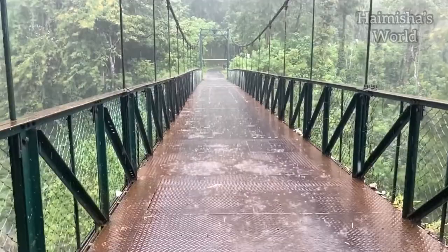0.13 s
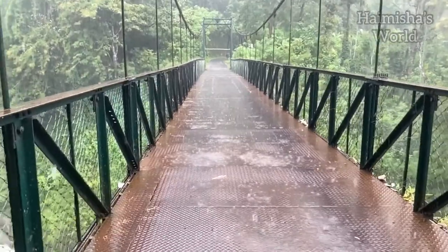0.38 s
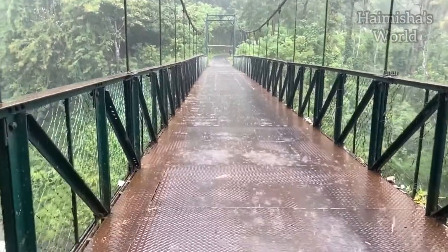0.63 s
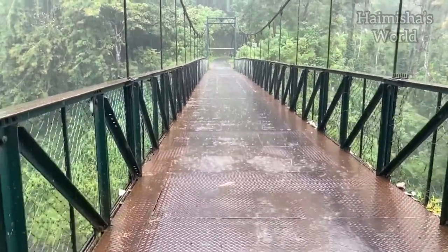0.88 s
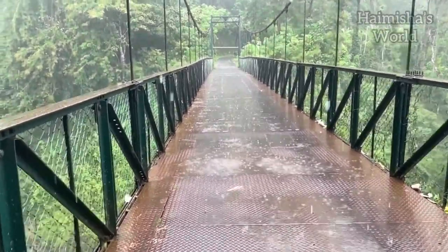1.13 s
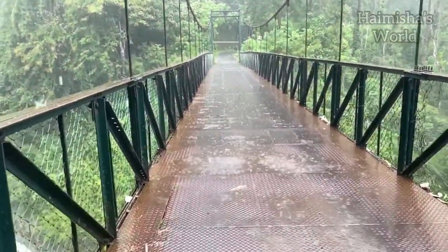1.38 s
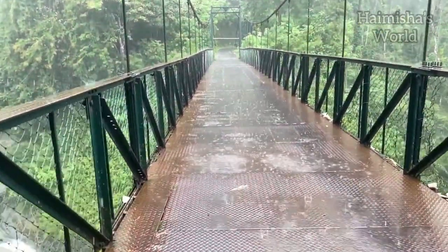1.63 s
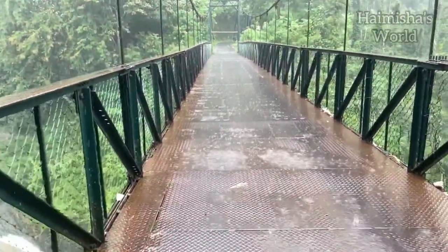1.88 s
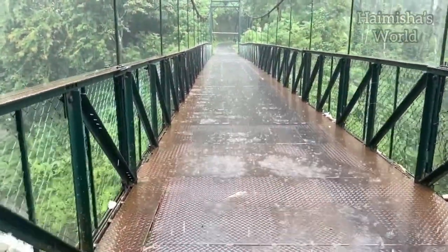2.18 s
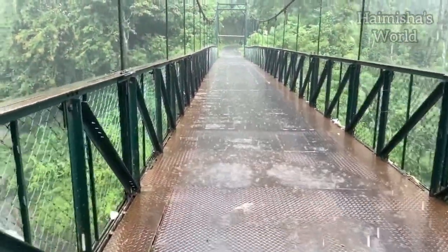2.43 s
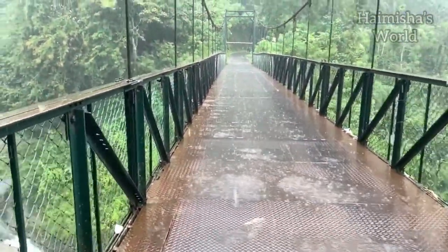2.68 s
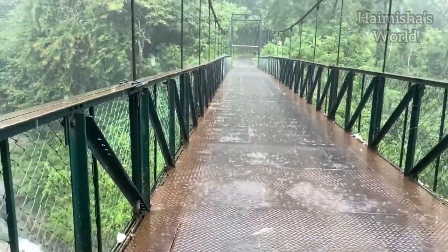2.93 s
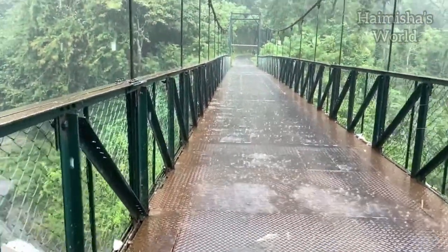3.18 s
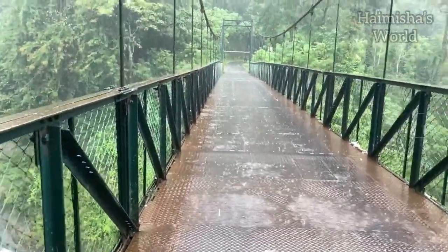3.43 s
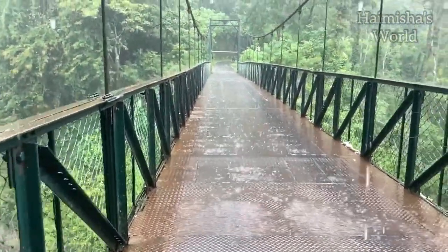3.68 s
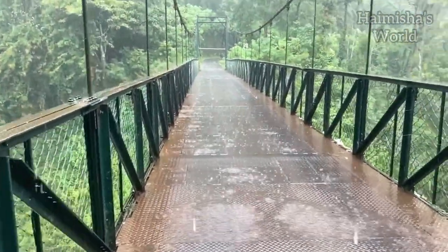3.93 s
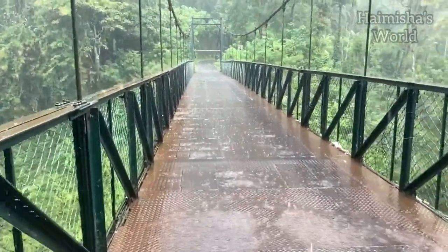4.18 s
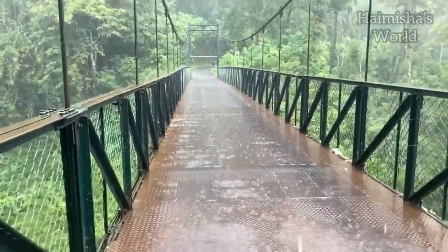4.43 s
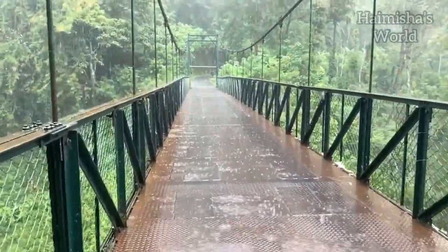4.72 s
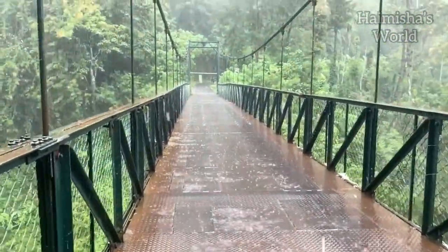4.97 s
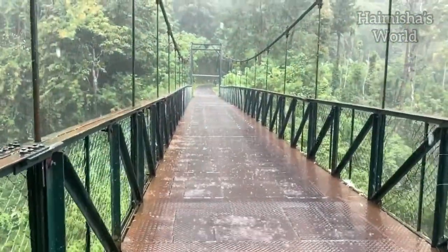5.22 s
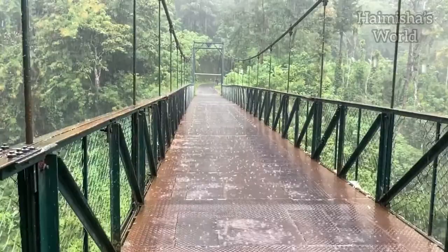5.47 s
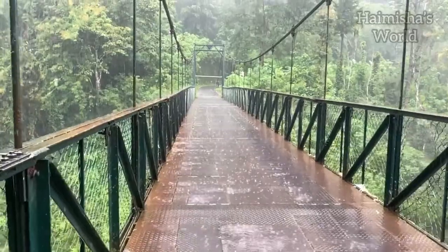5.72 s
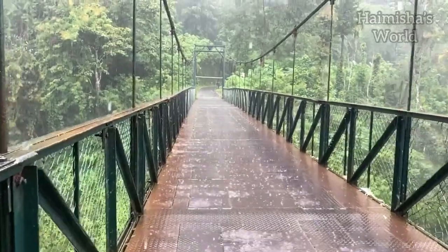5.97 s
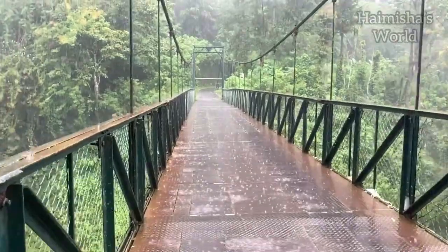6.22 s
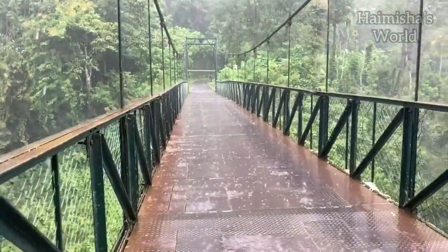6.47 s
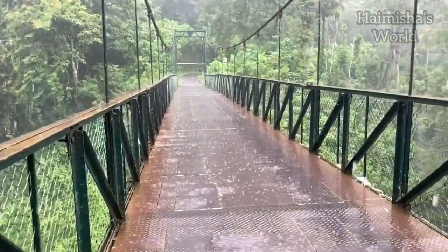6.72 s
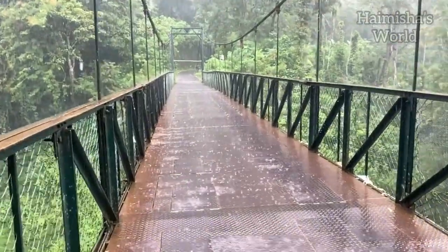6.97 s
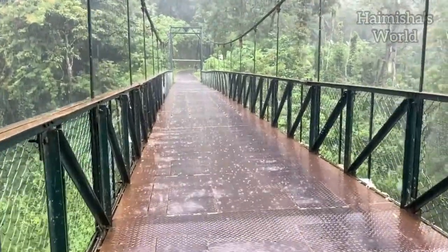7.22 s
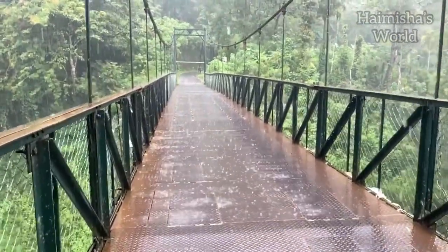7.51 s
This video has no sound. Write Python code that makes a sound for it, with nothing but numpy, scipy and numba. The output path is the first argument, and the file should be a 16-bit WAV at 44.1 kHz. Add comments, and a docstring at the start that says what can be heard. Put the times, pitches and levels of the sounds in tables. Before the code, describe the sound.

Continuous steady rain on a steel footbridge and surrounding forest, a dense soft patter over a low rumble. Close overhead, big drops hit umbrella cloth with short slaps and low hollow booms, irregular and sometimes clustered, amid many lighter taps. Crisp splashes flick on the deck and faint metallic pings ring. Close stereo pair beneath the umbrella, outdoors, top end slightly dulled.

```python
"""Rain on a steel footbridge

Steady rain on the bridge and the forest around it, heard from under an umbrella. Far drops are noise bands
flaring together into a patter over a low rumble; near splashes on the deck flare its upper bands further.
Drops on the stretched cloth are damped sines that slap and then boom; the steelwork pings and rings the same
way, and a faint wavering sine passes once. A pair of microphones a hand apart hears it, each with its own
phase and balance by frequency, the treble reaching the right one first."""
import sys
import numpy as np
from scipy import signal
from scipy.fft import rfft, irfft, next_fast_len
from scipy.io import wavfile
from scipy.ndimage import uniform_filter1d
from numba import njit

SR = 44100
rng = np.random.default_rng(int(sys.argv[2]) if len(sys.argv) > 2 else 0)


def linear_from_db(decibels):
    """Turn decibels (scalar or array-like) into linear amplitude factors; 0 gives 1."""
    return 10 ** (np.asarray(decibels, float) / 20)


def store_pcm(level_fs):
    """Save levels as 16-bit WAV."""
    pcm = np.round(np.clip(level_fs, -1, 1) * 32767).astype(np.int16)
    wavfile.write(sys.argv[1], SR, np.atleast_2d(pcm).T)


N = 335950

# strength of the far rain, before the microphones' balance: (time [s], level [dB])
RAIN_STRENGTH = [(0.0, -33), (1.4, -32), (2.76, -32.5), (4.0, -31), (5.11, -32.5), (5.6, -32), (7.62, -32)]
# relative colour of the far rain: (frequency [Hz], level per Hz [dB])
PATTER_COLOUR = [(20, -0.5), (35, 6), (70, -0.5), (120, -2), (200, 0.5), (260, -4.5), (320, -4), (400, -9),
                 (480, -12), (600, -5.5), (900, -14), (1200, -13.5), (1950, -17.5), (2600, -15.5),
                 (4200, -25.5), (6000, -27.5), (7500, -34.5), (9300, -35.5)]
# tonal balance of the microphones: (frequency [Hz], left minus right [dB])
MICROPHONE_BALANCE = [(60, -1.5), (180, -3), (320, 2.5), (560, .5), (970, -2.5), (1700, -.5), (3000, -.5),
                      (4800, -1.5), (6100, 0), (9500, 0)]
# how alike the microphones hear the far rain: (frequency [Hz], shared power [0-1])
ALIKENESS = [(30, .92), (150, .75), (300, .45), (550, .12), (850, .65), (1250, .25), (1600, .35),
             (1900, .1), (2500, .15), (3300, .48), (3800, .12), (4500, .62), (5400, .94), (6200, 1),
             (9500, 1)]
# phase lead of the left microphone: (frequency [Hz], lead [half turns])
LEFT_LEAD = [(0, 0), (950, 1.43), (2840, 5.16), (3100, 6.0), (3360, 6.2), (4000, 5.35), (5450, 4),
             (9550, 0)]
# upper modes of the umbrella cloth, before detuning and weighting: (frequency [Hz], level [dB], t60 [s])
CLOTH_MODES = [(300, 0, .045), (370, 0, .04), (450, -1, .035), (540, 0, .03), (640, 0, .028),
               (760, -1, .025), (900, -1, .025), (1080, -3, .022), (1300, -5, .02), (1600, -6, .02),
               (2000, -7, .018), (2500, -8, .015), (3100, -12, .015)]
# big drops on the cloth, levels before swell and pan:
# (time [s], boom level [dB], boom frequency [Hz], slap level [dB], slap centre [Hz])
BIG_DROPS = [(0.163, -24.5, 220, -25, 360), (0.511, -23, 247, -21.5, 360), (0.53, -23, 199, -26, 600),
             (0.733, -23, 198, -39, 810), (0.953, -30, 250, -17, 640), (0.967, -28, 197, -23, 400),
             (0.985, -25, 207, -26, 860), (1.035, -23, 280, -24, 660), (1.306, -16.5, 174, -20, 670),
             (1.284, -24.5, 245, -28, 700), (1.41, -23, 190, -29, 780), (1.421, -34, 240, -21.5, 700),
             (1.46, -20, 179, -26, 560), (1.484, -23.5, 263, -19.5, 750), (1.502, -17, 152, -18.5, 360),
             (1.528, -28, 270, -23, 360), (1.603, -33, 181, -22, 880), (1.67, -16, 131, -18, 754),
             (1.828, -25, 160, -20, 420), (2.09, -19, 190, -21, 630), (2.42, -31, 180, -25, 460),
             (2.436, -27, 109, -18.5, 820), (2.686, -19.5, 226, -37, 360), (3.105, -20.5, 204, -20.5, 360),
             (3.17, -24, 236, -33, 720), (3.29, -23, 226, -34, 360), (3.492, -21, 171, -27, 430),
             (3.576, -20, 167, -34, 1240), (3.767, -20.5, 202, -27, 410), (4.042, -16.5, 174, -18.5, 650),
             (4.077, -25, 284, -21, 680), (4.111, -21, 250, -35, 800), (4.188, -24, 202, -23, 750),
             (4.295, -35, 224, -23, 410), (4.51, -25, 150, -23, 400), (4.664, -19.5, 207, -22.5, 610),
             (4.688, -30, 220, -26.5, 600), (4.708, -24, 180, -21, 540), (4.719, -29, 190, -25, 1210),
             (5.111, -18.5, 160, -22.5, 570), (5.139, -18.5, 193, -23, 470), (5.322, -22, 177, -37, 930),
             (5.433, -26, 189, -25, 620), (5.579, -18.5, 199, -23, 560), (5.7, -21, 202, -25, 900),
             (5.781, -20, 220, -22.5, 660), (5.792, -28, 217, -18, 590), (6.09, -25, 202, -23.5, 890),
             (6.386, -24, 187, -18.5, 700), (6.429, -15.5, 170, -22, 560), (6.497, -22, 244, -21, 600),
             (6.701, -22, 204, -25.5, 410), (6.85, -18, 152, -24.5, 600), (7.194, -23, 200, -20, 640),
             (7.353, -17, 185, -19.5, 400)]
# near splashes on the deck, over the mean patter in the upper middle and in the treble:
# (time [s], body level [dB], spray level [dB])
NEAR_SPLASHES = [(0.108, -8, 13.5), (0.163, 11, 1.5), (0.512, 7.5, -0.5), (0.6755, 8, 9), (0.948, 7, -11.5),
                 (1.063, -3, 16.5), (1.306, 7, 5), (1.601, 8, -0.5), (2.084, 7, 11), (2.385, -2.5, 8.5),
                 (2.399, 0.5, 11), (2.4204, 6.5, 9), (2.624, -1, 15.5), (2.634, 9.5, 13.5),
                 (2.683, 10.5, -2), (2.93, 9, 9), (3.104, 7.5, -11.5), (3.3837, -12, 11), (3.783, 6.5, 1),
                 (4.72, 12, 3), (5.1366, 9, -3.5), (5.576, 13, -11), (5.7628, 9.5, 12.5), (6.0071, 0.5, 13),
                 (6.0166, -3, 10), (6.2096, 11, 11.5), (6.3823, 13.5, 4.5), (6.4275, 6.5, -10),
                 (6.698, 7, 7)]
# the faint tone before it wavers: (time [s], frequency [Hz], rms level [dB])
TONE_PATH = [(5.36, 915, -62), (5.46, 924, -49), (5.58, 909, -42.5), (5.68, 900, -49), (5.76, 860, -51),
             (5.9, 850, -62)]
# long rings of the steelwork, before detuning: (frequency [Hz], relative level [dB], t60 [s])
STEEL_RINGS = [(590, 0, 0.35), (640, -4.5, 0.22), (842, 1, 0.26), (888, -4.5, 0.42), (1060, -2, .25),
               (1424, -9, 0.16), (1650, -6.5, 0.11), (2470, -7.5, .15)]
# centres of the patter's octave bands [Hz]
BANDS_HZ = 40 * 2. ** np.arange(9)


def on_log_hz(table, hz):
    """Read a (frequency, value) table along log frequency."""
    f, v = np.transpose(table)
    return np.interp(np.log(hz + 1), np.log(f), v)


def walk(rate):
    """Random levels held for 1 / rate seconds and smoothed twice; spread near 1."""
    hold = int(SR / rate)
    steps = np.repeat(rng.standard_normal(N // hold + 1), hold)
    return 1.15 * uniform_filter1d(uniform_filter1d(steps, hold), hold)[:N]


def bursts(s, power, decay_s):
    """Power that jumps at each time and dies away exponentially."""
    kicks = np.bincount(np.clip(s * SR, 0, N - 1).astype(int), power, N)
    return signal.lfilter([1], [1, -np.exp(-1 / (decay_s * SR))], kicks)


@njit
def ring(start, hz, t60, gain, push, count):
    """Damped sines that swell in over `push` cycles; row 0 of start and gain is left, row 1 right."""
    out = np.zeros((2, count))
    for k in range(len(hz)):
        turn = np.exp(2j * np.pi * hz[k] / SR - np.log(1000) / (t60[k] * SR))
        release = np.exp(-hz[k] / (push * SR))
        for c in range(2):
            z, held = gain[c, k] + 0j, 1.0
            for i in range(start[c, k], min(start[c, k] + int(t60[k] * SR), count)):
                out[c, i] += z.imag * (1 - held)
                z *= turn
                held *= release
    return out


def left_right_starts(s, lag_s):
    """First sample of each event at both microphones, the left one later by twice lag_s."""
    side = np.array([[1], [-1]])
    return np.clip((s + side * lag_s) * SR, 0, N).astype(np.int64)


def patter():
    """Three unrelated noises whose octave bands flare together wherever a drop lands."""
    per_s, size_db, drop_db, most_db = 260, 3.0, -5.5, 7.0
    reach_oct, decay_s, cycles = 0.76, 0.003, 0.85
    splash_s, spray_s, flicker_db = 0.0028, 0.0018, 0.96
    chance = rng.random((int(per_s * N / SR), 3)).T
    drop_s = chance[0] * N / SR
    power = linear_from_db(np.minimum(drop_db - size_db * np.log(chance[1]), most_db)) ** 2
    centre = np.log2(150.) + 6.9 * chance[2]
    splash_time, body_db, spray_db = np.transpose(NEAR_SPLASHES)
    size = next_fast_len(N)
    octave = np.log2(np.fft.rfftfreq(size, 1 / SR) + 1)
    noise = rfft(rng.standard_normal((3, size)))
    out = 0
    for hz in BANDS_HZ:
        fade_s = decay_s + cycles / hz  # low notes of a drop last longer
        nearness = np.exp(-((np.log2(hz) - centre) / reach_oct) ** 2)
        flare = bursts(drop_s, power * nearness, fade_s)
        swing = (1 + flare) / np.mean(1 + flare)
        if hz > 4000:
            swing = swing + bursts(splash_time, linear_from_db(spray_db) ** 2, spray_s)
        elif hz > 1000:
            swing = swing + bursts(splash_time, linear_from_db(body_db) ** 2, splash_s)
        band = np.cos(np.pi / 2 * np.clip(octave - np.log2(hz), -1, 1))
        out = out + irfft(noise * band, size)[:, :N] * np.sqrt(swing) * linear_from_db(flicker_db * walk(8))
    return out


def far_rain(noises):
    """Colour the patter; one noise is shared by both sides, the others belong to one side each."""
    size = next_fast_len(N)
    hz = np.fft.rfftfreq(size, 1 / SR)
    shared, *own = rfft(noises, size)
    alike = np.clip(on_log_hz(ALIKENESS, hz), 0, 1)
    blend = np.sqrt(alike) * shared + np.sqrt(1 - alike) * np.array(own)
    pair = irfft(linear_from_db(on_log_hz(PATTER_COLOUR, hz)) * blend, size)[:, :N]
    return pair / np.sqrt(np.mean(pair ** 2))


def cloth(s, boom_db, boom_hz, slap_db, slap_hz, pan_db, lag_s=0.):
    """Each drop slaps the upper modes nearest its slap centre, then the whole panel booms."""
    boom_t60, push = 0.05, 0.46  # s, cycles
    fall_db, scatter_db, detune = 3.5, 2.0, 0.12  # dB per octave, dB, log frequency
    late_cycles, ragged_s, lag_spread_s = 0.44, 0.001185, 0.00019
    hz, db, t60 = np.transpose(CLOTH_MODES)
    chance = rng.standard_normal((len(s), 5, len(CLOTH_MODES) + 1))
    distance_oct = np.abs(np.log2(hz / slap_hz[:, None]))
    weight = linear_from_db(db - fall_db * distance_oct + scatter_db * chance[:, 0, 1:])
    weight = weight / np.sqrt(np.sum(weight ** 2, axis=1, keepdims=True))
    slap = linear_from_db(slap_db)[:, None] * weight * np.sign(chance[:, 1, 1:])
    size = np.column_stack([linear_from_db(boom_db), slap])
    pitch = np.column_stack([boom_hz, hz * np.exp(detune * chance[:, 2, 1:])])
    # high notes run through the cloth faster, so each thud slides downward
    onset = s[:, None] + late_cycles / pitch + ragged_s * chance[:, 3]
    lag = lag_s + lag_spread_s * (chance[:, 4, :1] + chance[:, 4])
    start = left_right_starts(onset.ravel(), -lag.ravel() / 2)
    side = np.array([1, -1])[:, None, None]
    gain = size * linear_from_db(side * pan_db[:, None] / 2)
    rings = np.tile(np.append(boom_t60, t60), len(s))
    return ring(start, pitch.ravel(), rings, gain.reshape(2, -1), push, count=N)


def big_drops():
    """The drops on the cloth that stand out one by one."""
    pan_db = -0.1 + 0.5 * rng.standard_normal(len(BIG_DROPS))  # left minus right
    # landing overhead, they reach both microphones more nearly together than the far rain
    return cloth(*np.transpose(BIG_DROPS), pan_db, lag_s=-0.00049)


def small_drops():
    """The many lesser drops strike the same cloth at random times, pitches and sides."""
    per_s, base_db, size_db, most_db, slap_db = 120, -41, 3.5, -27, -1.5
    u = rng.random((int(per_s * N / SR), 6)).T
    boom_db = np.minimum(base_db - size_db * np.log(u[1]), most_db)
    slap_level = boom_db + slap_db + 8 * (u[3] - .5)
    pan_db = 6 * (u[5] - .5)
    return cloth(u[0] * N / SR, boom_db, 110 * 3.1 ** u[2], slap_level, 350 * 8.2 ** u[4], pan_db)


def deck():
    """Drops ping the steel plates all around: one short partial each, shorter and fainter when higher."""
    per_s, base_db, size_db, most_db, tilt_db = 350, -50, 4.0, -40, -3.0  # tilt per octave
    longest_t60, lag_s, push = 0.082, 0.0005, 0.7  # s, s, cycles
    u = rng.random((int(per_s * N / SR), 5)).T
    octaves = 3.9 * u[1]
    start = left_right_starts(u[0] * N / SR, lag_s * (u[2] - .5))
    level_db = np.minimum(base_db - size_db * np.log(u[3]), most_db) + tilt_db * octaves
    side = np.array([[1], [-1]])
    gain = linear_from_db(level_db + side * 3.5 * (u[4] - 0.2))  # leaning left
    return ring(start, 400 * 2 ** octaves, longest_t60 / (1 + 0.59 * octaves), gain, push, count=N)


def steelwork():
    """Drops at random moments each set one of the long rings going, slightly detuned."""
    per_s, base_db, size_db, most_db = 60, -50, 5.5, -42
    detune, lag_s, push, pan_db = 0.015, 0.0003, 2.3, 9.5  # share, s, cycles, dB
    u = rng.random((int(per_s * N / SR), 6)).T
    chosen = (u[1] * len(STEEL_RINGS)).astype(int)
    hz, db, t60 = np.transpose(STEEL_RINGS)[:, chosen]
    start = left_right_starts(u[0] * N / SR, lag_s * (u[2] - .5))
    level_db = np.minimum(base_db - size_db * np.log(u[3]), most_db) + db
    side = np.array([[1], [-1]])
    gain = linear_from_db(level_db + side * pan_db * (u[4] - .5))
    return ring(start, hz * (1 + detune * (2 * u[5] - 1)), t60, gain, push, count=N)


def faint_tone():
    """A sine wavering in pitch and level, silent outside its moment."""
    t = np.arange(N) / SR
    s, hz, db = np.transpose(TONE_PATH)
    pitch = np.interp(t, s, hz) * (1 + 0.0079 * walk(25))
    wave = np.sqrt(2) * np.sin(2 * np.pi * np.cumsum(pitch) / SR)
    return wave * np.interp(t, s, linear_from_db(db), 0, 0) * linear_from_db(3.5 * walk(30))


def two_microphones(pair):
    """Each microphone has its own lead in phase and its own balance by frequency."""
    size = next_fast_len(N)
    hz = np.fft.rfftfreq(size, 1 / SR)
    side = np.array([[1], [-1]])
    turn = np.exp(.5j * np.pi * side * np.interp(hz, *np.transpose(LEFT_LEAD)))
    balance = linear_from_db(side * on_log_hz(MICROPHONE_BALANCE, hz) / 2)
    return irfft(rfft(pair, size) * turn * balance, size)[:, :N]


def scene():
    """Far patter swelling with the rain, drops on the cloth, pings and rings of the steel, a faint tone."""
    strength_db = np.interp(np.arange(N) / SR, *np.transpose(RAIN_STRENGTH))
    rain = far_rain(patter()) * linear_from_db(strength_db)
    umbrella = big_drops() + small_drops()
    bridge = deck() + steelwork()
    return two_microphones(rain + umbrella + bridge + faint_tone())


def band_limit(x):
    """A steep low-pass at the top of the band."""
    return signal.sosfilt(signal.butter(12, 9660, fs=SR, output="sos"), x)


def record(dry):
    """The deepest bass rolls off and the top is cut steeply."""
    low = signal.butter(1, 12, "high", fs=SR, output="sos")
    top = signal.ellip(8, .3, 45, 9330, fs=SR, output="sos")
    mix = signal.sosfilt(np.vstack([low, top]), dry)
    return band_limit(mix)


dry = scene()
out = record(dry)
store_pcm(out)
```